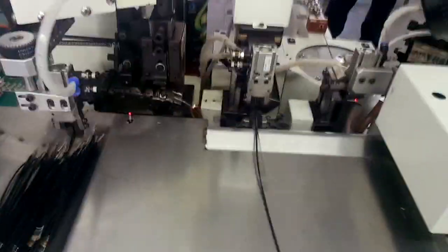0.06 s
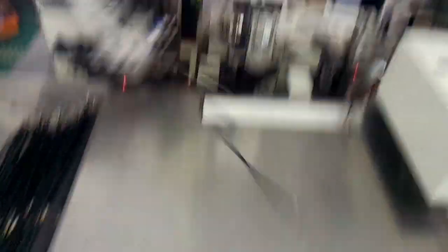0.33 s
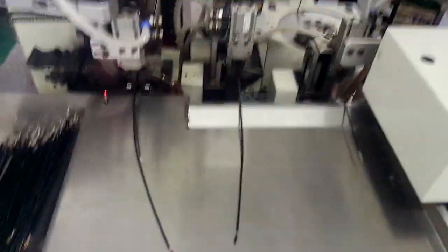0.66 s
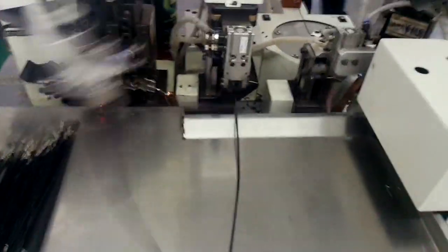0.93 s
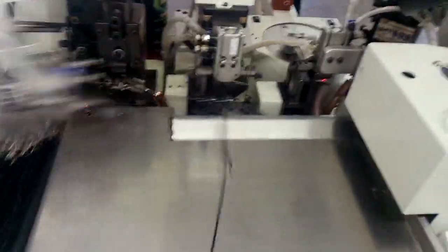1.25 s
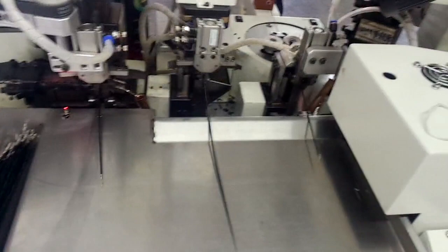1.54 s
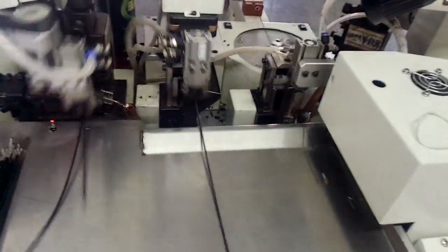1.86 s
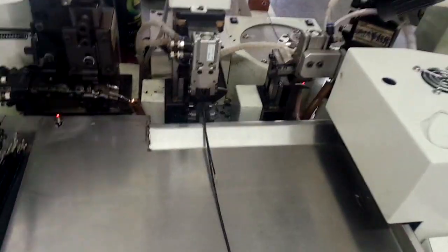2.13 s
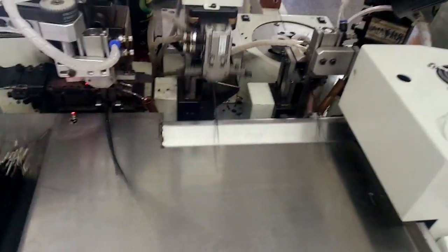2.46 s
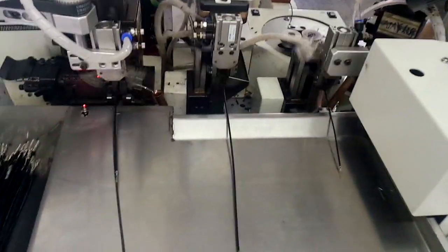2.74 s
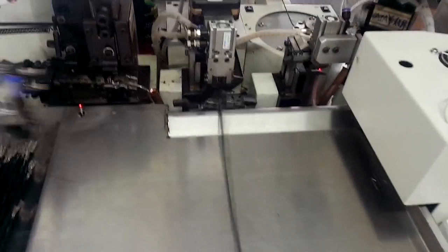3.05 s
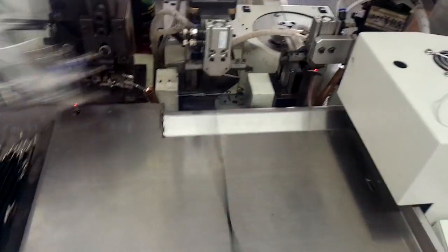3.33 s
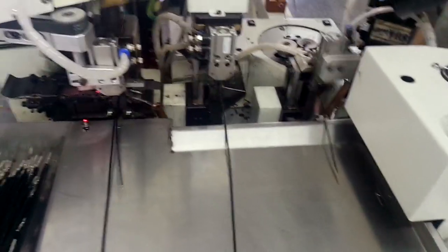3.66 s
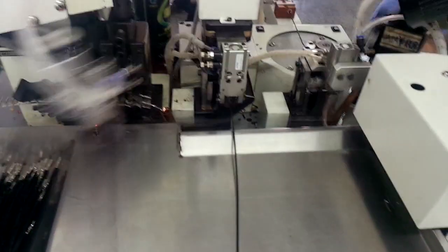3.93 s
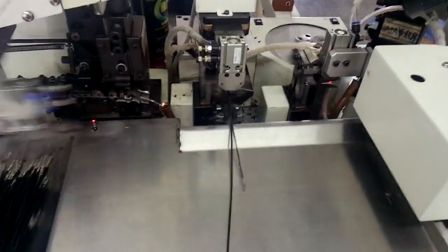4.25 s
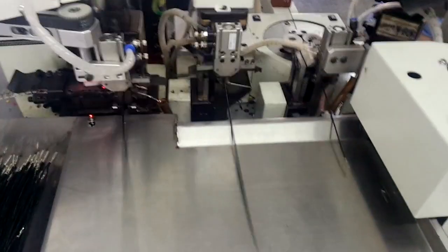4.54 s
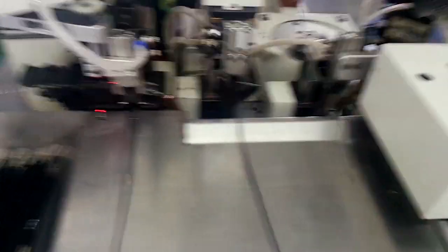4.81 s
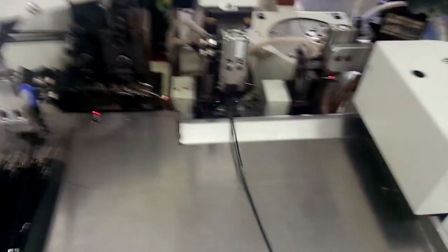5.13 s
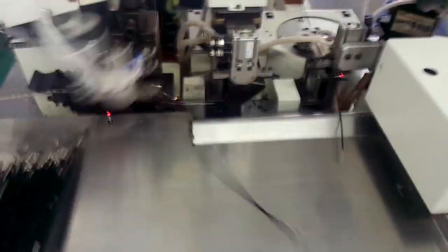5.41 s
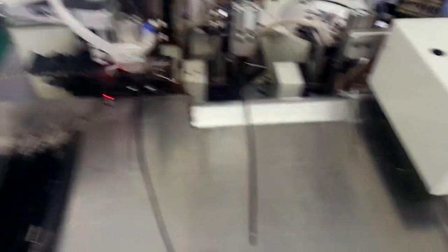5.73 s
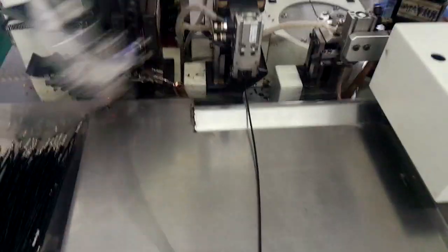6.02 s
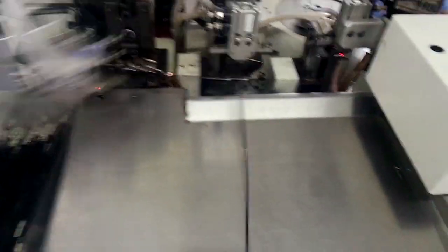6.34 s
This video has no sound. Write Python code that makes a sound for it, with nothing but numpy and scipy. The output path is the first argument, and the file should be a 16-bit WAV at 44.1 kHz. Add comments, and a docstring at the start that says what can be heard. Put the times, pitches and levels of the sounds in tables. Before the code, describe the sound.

Sharp knocks and short hisses of air repeat about once a second, close to a mono microphone in a noisy workshop. A wire-crimping machine's cutter strikes, air bursts out, a quieter motor hum and rail scrape follow, then the press knocks with a rough falling whirr before another burst of air. Steel clicks, rattling and rumbling fill the gaps over the hall's low drone.

```python
"""Sharp knocks and hisses of air, about one round a second: an automatic wire-crimping machine at work,
close to a narrow-band mono microphone in a noisy workshop. In each cycle the cutter knocks, a valve
exhausts, the feed motor runs up, the transfer arm scrapes along its rail, the press rumbles through
its stroke and a second valve exhausts. Every stroke repeats the same pattern of contacts; grippers
click and slides rattle in between, over the drone of the hall."""
import sys
import numpy as np
from scipy import signal
from scipy.fft import rfft, irfft, next_fast_len
from scipy.io import wavfile

SR = 44100
rng = np.random.default_rng(int(sys.argv[2]) if len(sys.argv) > 2 else 0)


def wav_out(sig):
    """Save sig, one row per channel (or a flat mono array), as 16-bit PCM at SR to the path in sys.argv[1]."""
    wavfile.write(sys.argv[1], SR, np.round(np.clip(np.atleast_2d(sig).T, -1, 1) * 32767).astype(np.int16))


N = 281358
TIME = np.arange(N) / SR
CYCLE_S = 1.018  # one wire per cycle, the first from 0 s

# Levels in all tables are relative: each source adds its own gain.
# Press strokes. Each row: time in seconds, then knock, crack, steel ring, whirr and rattle in dB.
PRESS_STROKES = [(.639, -4.5, 0, -4, -23, -26), (1.647, 0, -2, -7, -23, -25),
                 (2.661, -6, -5.5, 1, -27, -39), (3.679, -0.5, -4.5, 0.5, -25, -37),
                 (4.7, -2.5, -2.5, 1, -23, -25), (5.717, -0.5, -3, -7.5, -23.5, -28.5)]
# Cutter strokes. Each row: time in seconds, then knock, blade ring and click in dB.
CUTTER_STROKES = [(0.029, -5.5, -6.5, -1), (1.05, -12.5, -10.5, -4.5), (2.0544, -11, -17, -1),
                  (3.076, -11, -34, -2), (4.0989, -14, -17, -2), (5.12, -19, -31, -2.5),
                  (6.131, -13.5, -12, -2.5)]
# Cutter valve bursts. Each row: start in seconds, then level, opening surge and whistle in dB.
CUTTER_BURSTS = [(.135, -13.5, 1.5, -5), (1.155, -15.5, 0, -5), (2.175, -14.5, 4.5, -3.5),
                 (3.1845, -14, 4.5, -3), (4.204, -15, 3.5, -5), (5.223, -15.5, 3, -2),
                 (6.244, -15.5, 2.5, -4.5)]
# The cycles in order. Each row: feed motor level in dB, arm swing level in dB.
CYCLE_LEVELS = [(-24.5, -24), (-26, -29), (-27.5, -26.5), (-24, -25), (-22, -24), (-24, -35)]
# Modes of the steel parts and of the frame. Each row: pitch in Hz, level in dB, T60 in seconds.
STEEL_MODES = [(1640, -4.5, .03), (1954, -7.5, 0.083), (2680, 0, .02), (3280, 4, .025), (3480, -2, 0.019),
               (3850, -7, .015), (4330, -3.5, .03), (4660, -11.5, 0.035), (6590, -3.5, .03)]
FRAME_MODES = [(185.8, -9.5, .12), (236.6, -6.5, 0.091), (338, -9.5, 0.08), (365, -9.5, 0.075),
               (469, -11, 0.078), (552, -4, .06), (641, -5.5, 0.12), (770, -5.5, 0.044), (835, 1.5, 0.034),
               (990, -1.5, 0.045), (1094, -14.5, 0.075), (1378, 7.5, 0.011)]


def press(brake_after_s=.08):
    """The ram and its linkage knock on the frame; the drive whirrs down roughly and shakes it."""
    # Knocks of one stroke. Each row: delay in seconds, level in dB.
    knocks = [(0, -9), (.032, -2), (.066, -8.5), (.097, -10.5), (.138, -7)]
    # The braking drive. Each row: seconds from reaching rest speed, pitch in Hz, level in dB.
    braking = [(-.17, 1005, -42), (-.09, 900, -2.5), (-.05, 647.8, -1.5), (-.015, 403.3, -3.5),
               (0, 348, -1), (.035, 319.4, 3), (.09, 344, -19.5)]
    stroke_s, knock_db, _, _, drive_db, _ = np.transpose(PRESS_STROKES)
    times, db = repeated(knocks, stroke_s, knock_db)
    out = body(blows(times, db - 10.5, fade_s=.016), FRAME_MODES)
    shake = rms_one(band(grains(per_s=900, spread_db=5.5), 400, 720))
    course_s, course_hz, course_db = np.transpose(braking)
    for rests_at, whirr_db in zip(stroke_s + brake_after_s, drive_db):
        hz = np.interp(TIME - rests_at, course_s, course_hz)
        load = from_db(whirr_db + np.interp(TIME - rests_at, course_s, course_db, left=-99, right=-99))
        whirr = tone(hz, wander_hz=.12 * hz) * (1 + .54 * drift(70))
        out += load * (from_db(-3) * whirr + from_db(-3.5) * shake)
    return band(out, 90, 5000)


def ram(fastest_after_s=.055):
    """Loose play in the guides rattles while the ram travels, and sets the steel ringing."""
    travel = sum(from_db(db) * swell(s + fastest_after_s, half_s=.049) for s, *_, db in PRESS_STROKES)
    rattle = rms_one(band(grains(per_s=1500, spread_db=1.5), 1500, 4500))
    ringing = body(travel * grains(per_s=330, spread_db=2.5), STEEL_MODES)
    return travel * rattle + from_db(-4) * ringing


def cutter(blade_hz=814, knock_after_s=.005, build_s=.0061):
    """Each stroke knocks on the block; the blade holder swells into a short ring."""
    # Modes of the block. Each row: pitch in Hz, level in dB, T60 in seconds.
    block_modes = [(137.5, -7.5, .2), (230, -8.5, 0.091), (314, -6, 0.17), (370, -3, 0.18),
                   (616, -5, 0.049), (822, 2, 0.068), (970, -4, .04), (1445, 3.5, 0.028)]
    cut_s, knock_db, ring_db, _ = np.transpose(CUTTER_STROKES)
    times = cut_s + knock_after_s
    knock = band(body(blows(times, knock_db - 5.5, fade_s=.023), block_modes), 90, 5000)
    ringing = smooth(blows(times, ring_db, fade_s=.013), build_s)
    return knock + ringing * tone(blade_hz, wander_hz=27.9)


def cutter_valve():
    """Air leaves the cutter's valve in an abrupt, whistling hiss."""
    # Jet noise. Each row: frequency in Hz, level in dB.
    jet = [(900, -30), (1900, -11), (2500, -14.5), (3300, -2), (4600, -5), (5700, -2), (7000, -9.5),
           (7800, 6)]
    # Cavity resonances, the whistle first. Each row: centre in Hz, width in Hz, level in dB.
    port = [(4190, 260, 10.5), (3400, 220, -6), (5010, 330, 2.5), (5540, 150, -2.5), (6470, 500, 3.5),
            (6950, 300, -0.5)]
    return exhaust(CUTTER_BURSTS, jet, port, open_s=.13, rise_s=.00077, fall_s=.014,
                   surge_at_s=.0027, surge_s=.0067, flutter_db=.7)


def press_valve():
    """Air leaves the press's valve with a softer onset and a higher whistle."""
    # Each row: start in seconds, then level, opening surge and whistle in dB.
    bursts = [(.784, -18, 7.5, 3), (1.793, -17, 5, -4.5), (2.811, -16, 2.5, -2), (3.831, -16.5, 8, -3),
              (4.852, -14, 4.5, -5), (5.868, -16, 5.5, -6)]
    # Jet noise. Each row: frequency in Hz, level in dB.
    jet = [(900, -17), (2200, -9), (2900, -1), (3600, -4.5), (4600, -0.5), (5800, 1.5), (7000, 0.5),
           (7800, -1.5)]
    # Cavity resonances, the whistle first. Each row: centre in Hz, width in Hz, level in dB.
    port = [(5420, 180, 9.5), (3223, 150, -0.5), (4090, 380, 0.5), (4980, 400, 0), (6270, 300, 1),
            (6900, 250, -2.5)]
    return exhaust(bursts, jet, port, open_s=.12, rise_s=.008, fall_s=.012,
                   surge_at_s=.021, surge_s=.0085, flutter_db=-.5)


def exhaust(bursts, jet, port, open_s, rise_s, fall_s, surge_at_s, surge_s, flutter_db):
    """Air rushes through an open port, hardest just after the valve opens; the cavity whistles."""
    whistle, *resonances = [from_db(db + 2 * drift(7.2)) * noise_band(hz, width)
                            for hz, width, db in port]
    rush = colour(rng.standard_normal(N), jet + [(9000, -40)]) + sum(resonances)
    out = np.zeros(N)
    for opens, level_db, surge_db, whistle_db in bursts:
        age = np.maximum(TIME - opens, 0)
        gate = (1 - np.exp(-age / rise_s)) * np.exp(-np.clip(age - open_s, 0, 1) / fall_s)
        flow = gate * from_db(level_db + surge_db / (1 + ((age - surge_at_s) / surge_s) ** 2))
        out += flow * (rush + from_db(whistle_db) * whistle)
    return out / np.std(rush + whistle) * from_db(flutter_db * drift(130))


def clicks():
    """Steel on steel at the cutter, its valve and the press: a short crack and a brief ring."""
    # Each row: seconds from the stroke or valve opening, crack in dB, steel ring in dB.
    gripper_then_blades = [(-.022, -5.5, -9.5), (0, 0.5, -13)]
    press_stops = [(0, 0, -3), (.064, -7.5, -6.5), (.106, -7, 0)]
    valve_click = [(.001, -4.5, -18)]
    cut_s, _, _, cut_db = np.transpose(CUTTER_STROKES)
    stroke_s, _, stop_crack_db, stop_ring_db, _, _ = np.transpose(PRESS_STROKES)
    valve_s = np.transpose(CUTTER_BURSTS)[0]
    valve_db = np.zeros_like(valve_s)
    times, crack_db, ring_db = np.hstack([repeated(gripper_then_blades, cut_s, cut_db, cut_db),
                                          repeated(press_stops, stroke_s, stop_crack_db, stop_ring_db),
                                          repeated(valve_click, valve_s, valve_db, valve_db)])
    bright_noise = rms_one(band(rng.standard_normal(N), 1500, 6800))
    crack = blows(times, crack_db - 11.5, fade_s=.006) * bright_noise
    return crack + body(blows(times, ring_db - 11.5, fade_s=.0022), STEEL_MODES)


def transfer_arm(fastest_at_s=.468):
    """The arm scrapes along its rail and the wire guides ring, now and then with a thin squeak."""
    # Modes of the light wire guides. Each row: pitch in Hz, level in dB, T60 in seconds.
    guide_modes = [(951, -3, .08), (1264, -0.5, 0.067), (1429, 0.5, .06), (1592, -1.5, 0.054),
                   (1893, -2.5, .05)]
    # Squeaks of the slides. Each row: centre and half length in seconds, pitch in Hz, level in dB.
    squeaks = [(1.54, 0.044, 5600, -40), (3.59, .04, 5600, -42), (4.592, 0.016, 6900, -23),
               (4.603, 0.038, 5640, -36), (6.303, 0.072, 1934, -29)]
    speed = sum(from_db(db) * swell(cycle * CYCLE_S + fastest_at_s, half_s=.06)
                for cycle, (_, db) in enumerate(CYCLE_LEVELS))
    scrape = from_db(-2.5) * speed * rms_one(band(grains(per_s=920, spread_db=1), 850, 2000))
    shaking = speed * from_db(-4.5) + from_db(-31.5)  # the guides never quite rest
    guides = body(shaking * grains(per_s=400, spread_db=2.5), guide_modes)
    squeaking = sum(from_db(db) * swell(s, half_s) * tone(hz, wander_hz=56.2)
                    for s, half_s, hz, db in squeaks)
    return scrape + guides + squeaking


def feed_motor(full_hz=240, full_at_s=.358, run_up_s=.085, start_speed=.78, hold_s=.028, stop_s=.026):
    """The feed hums up to full speed, holds it briefly and stops."""
    out = np.zeros(N)
    for cycle, (level_db, _) in enumerate(CYCLE_LEVELS):
        since_full = TIME - (cycle * CYCLE_S + full_at_s)
        speed = np.interp(since_full, [-run_up_s, 0], [start_speed, 1])
        load = np.interp(since_full, [-run_up_s * 1.3, 0, hold_s, hold_s + stop_s], [0, 1, 1, 0])
        turns = full_hz * np.cumsum(speed) / SR + rng.random()
        out += from_db(level_db) * load * np.sin(2 * np.pi * turns)
    return out * from_db(1.2 * drift(25))


def carriages():
    """Moving slides: dense small contacts rumble in the frame and rattle in the light parts."""
    # Heavy slides and light parts on their travel. Each row: seconds into the cycle, level in dB.
    rumble_levels = [(0, -20.5), (.04, -17.5), (.09, -20.5), (.27, -20.5), (.32, -23), (.5, -20.5),
                     (.58, -20.5), (.64, -19), (.85, -23.5), (.89, -20.5), (.94, -24)]
    rattle_levels = [(.01, -29), (.04, -27.5), (.08, -28), (.3, -28), (.38, -30), (.56, -28.5),
                     (.64, -28.5), (.74, -29), (.88, -25.5), (.97, -31)]
    # Their spectra. Each row: frequency in Hz, level in dB.
    rumble_spectrum = [(100, -23), (190, 1.5), (330, 1.5), (450, -1.5), (650, -0.5), (850, -0.5),
                       (1100, -2.5), (1450, -5), (1900, -6), (2500, -9), (4000, -18.5), (7500, -34)]
    rattle_spectrum = [(800, -15), (1600, -1), (2300, -2.5), (3200, -1), (4200, -3.5), (5200, -3),
                       (6000, -2), (6800, -1.5), (7600, -12.5)]
    heavy = colour(grains(per_s=4000, spread_db=2), [(25, -58)] + rumble_spectrum + [(9000, -72.5)])
    frame = band(body(np.ones(N), FRAME_MODES), 110, 5000)
    heavy = rms_one(rms_one(heavy) + from_db(-8) * frame)
    contacts = grains(per_s=1800, spread_db=0) + from_db(2) * rng.standard_normal(N)
    light = rms_one(colour(contacts, [(60, -51)] + rattle_spectrum + [(9000, -57.5)]))
    rumble = from_db(every_cycle(rumble_levels) - 1.31) * heavy
    rattle = from_db(every_cycle(rattle_levels) + 3.5 + .8 * drift(26)) * light
    return rumble + rattle


def workshop(drone_db=-33.5, low_hum_hz=88):
    """The hall behind the machine: a steady drone, other machines humming and one brief low hum."""
    # Room tone. Each row: frequency in Hz, level in dB.
    drone_spectrum = [(20, -39.5), (32, -31.5), (48, -15.5), (66, -8.5), (92, -3), (112, 0.5), (135, 1),
                      (160, -3), (195, 1.5), (280, -7.5), (500, -11), (1500, -21), (7000, -38)]
    # Other machines. Each row: centre in Hz, width in Hz, level in dB.
    machine_hums = [(132.7, 14, -47), (332.5, 16, -43.5)]
    drone = from_db(drone_db) * rms_one(colour(rng.standard_normal(N), drone_spectrum))
    hums = sum(from_db(db) * rms_one(noise_band(hz, width)) for hz, width, db in machine_hums)
    low_hum_db = np.interp(TIME, [1.17, 1.26, 1.33, 1.45], [-59.5, -28, -25.5, -48])
    return drone + hums + from_db(low_hum_db) * np.sin(2 * np.pi * low_hum_hz * TIME)


def room(x, t60_s=.42):
    """A diffuse tail off the machine's panels and the walls."""
    age = np.arange(SR // 2) / SR
    tail = rng.standard_normal(len(age)) * from_db(-60 * age / t60_s) * (age > .004)
    return signal.fftconvolve(x, tail / np.sqrt(np.sum(tail ** 2)))[:N]


def repeated(pattern, *strokes):
    """Add a pattern of (delay, dB, ..) contacts to every stroke; strokes come as columns."""
    return [np.add.outer(stroke, contact).ravel()
            for stroke, contact in zip(strokes, np.transpose(pattern))]


def blows(times, db, fade_s):
    """Contact force: it jumps at each blow and fades as the parts chatter to rest."""
    starts = np.zeros(N)
    starts[np.clip(np.round(times * SR).astype(int), 0, N - 1)] = from_db(db)
    return signal.lfilter([1], [1, -np.exp(-1 / (fade_s * SR))], starts + 1e-18)


def grains(per_s, spread_db):
    """Tiny contacts of uneven size at random moments; unit power."""
    sizes = from_db(spread_db * np.minimum(rng.exponential(1, N), 4)) * rng.choice([-1, 1], N)
    return rms_one(sizes * (rng.random(N) < per_s / SR))


def body(force, modes):
    """A chattering contact drives each mode in its own way; the result keeps the force's power."""
    out = sum(from_db(db) * ring(force * rng.standard_normal(N), hz, t60) for hz, db, t60 in modes)
    return rms_one(out) * np.sqrt(np.mean(force ** 2))


def ring(x, hz, t60):
    """One decaying mode."""
    r, w = from_db(-60 / (t60 * SR)), 2 * np.pi * hz / SR
    return signal.lfilter([0, np.sin(w)], [1, -2 * r * np.cos(w), r * r], x + 1e-18)


def tone(hz, wander_hz):
    """A sine of unit power whose pitch trembles."""
    turns = np.cumsum(hz + wander_hz * drift(59.74)) / SR + rng.random()
    return np.sqrt(2) * np.sin(2 * np.pi * turns)


def swell(at_s, half_s):
    """A smooth rise and fall around one moment."""
    return np.exp(-np.minimum(((TIME - at_s) / half_s) ** 2, 50))


def every_cycle(rows):
    """Join (seconds into the cycle, value) rows by straight lines, round and round."""
    return np.interp(TIME, *np.transpose(rows), period=CYCLE_S)


def drift(rate_hz):
    """A smooth random wander with a spread of 1."""
    r = np.exp(-80 * np.pi * rate_hz / SR)  # one step per 40 samples
    slow = signal.lfilter([1], [1, -2 * r, r * r], rng.standard_normal(N // 40 + 2002))[2000:]
    return np.interp(np.arange(N) / 40, np.arange(len(slow)), rms_one(slow))


def smooth(x, lag_s):
    """Follow a level with a one-pole lag."""
    pole = np.exp(-1 / (lag_s * SR))
    return signal.lfilter([1 - pole], [1, -pole], x)


def colour(x, spectrum):
    """Give a steady sound a spectrum of (Hz, dB) points."""
    size = next_fast_len(N)
    hz, db = np.transpose(spectrum)
    bins = np.maximum(np.fft.rfftfreq(size, 1 / SR), 1)
    return irfft(rfft(x, size) * from_db(np.interp(np.log(bins), np.log(hz), db)), size)[:N]


def noise_band(hz, width_hz):
    """Narrow noise around one pitch."""
    return band(rng.standard_normal(N), hz - width_hz / 2, hz + width_hz / 2)


def band(x, low_hz, high_hz):
    """Second-order band-pass."""
    return signal.sosfilt(signal.butter(2, [low_hz, high_hz], "band", fs=SR, output="sos"), x + 1e-18)


def from_db(db):
    """Decibels to gain."""
    return 10 ** (np.asarray(db) / 20)


def rms_one(x):
    """Scale to unit power."""
    return x / np.sqrt(np.mean(x ** 2) + 1e-20)


def scene():
    """The machine close up and the hall behind it, the same in both channels."""
    air = cutter_valve() + press_valve()
    near = from_db(.5) * air + clicks() + press() + ram() + cutter() + transfer_arm()
    mono = near + from_db(-15) * room(near) + feed_motor() + carriages() + workshop()
    return np.array([mono, mono])


def record(dry):
    """The recorder's gain control leans on the loud moments, peaks are rounded and the top is cut."""
    threshold_db, ceiling, cutoff_hz = -14, .92, 7300
    level_db = 10 * np.log10(smooth(dry[0] ** 2, lag_s=.098) + 1e-9)
    held = dry * from_db(-.33 * np.maximum(level_db - threshold_db, 0))
    rounded = held / (1 + (held / ceiling) ** 4) ** .25
    return signal.sosfiltfilt(signal.ellip(7, .1, 45, cutoff_hz, fs=SR, output="sos"), rounded)


dry = scene()
out = record(dry)
wav_out(out)
```